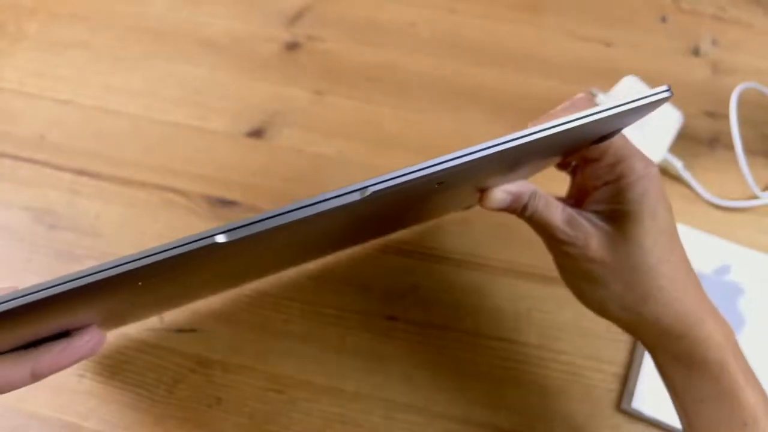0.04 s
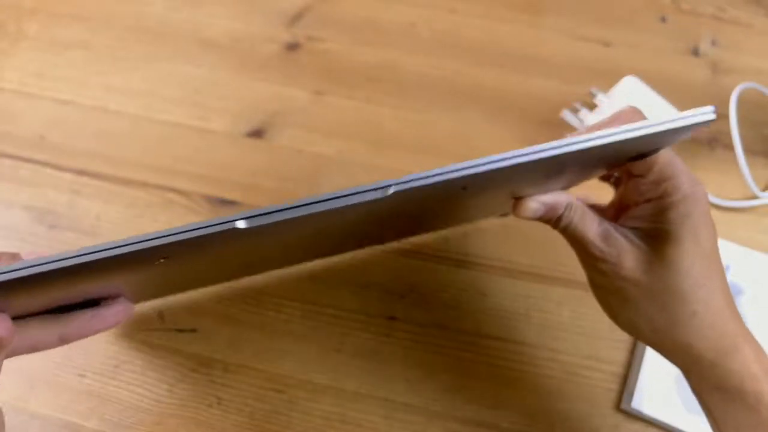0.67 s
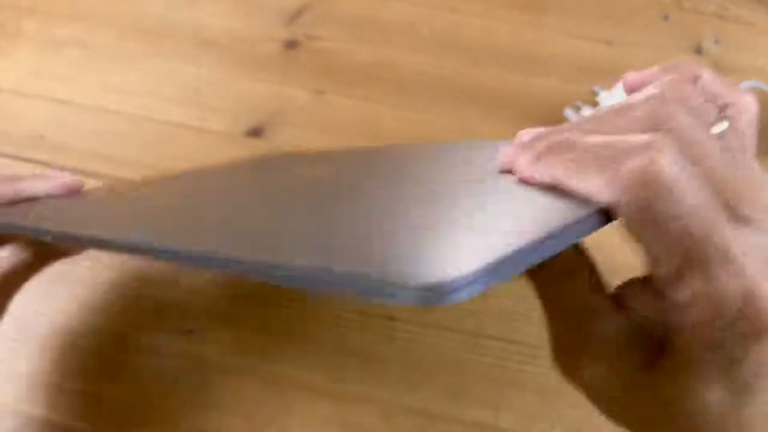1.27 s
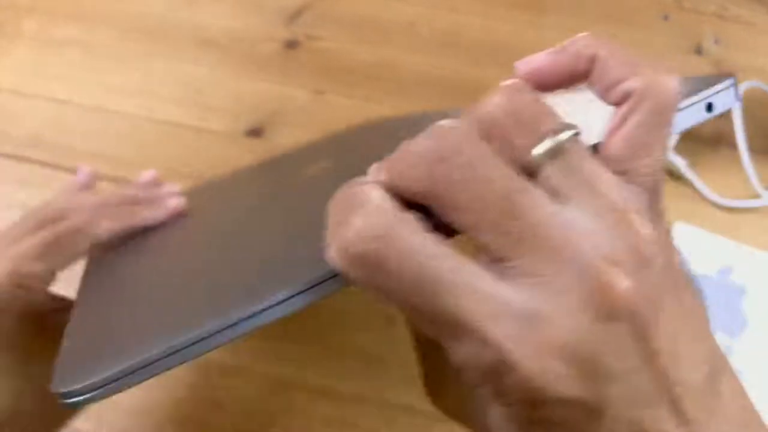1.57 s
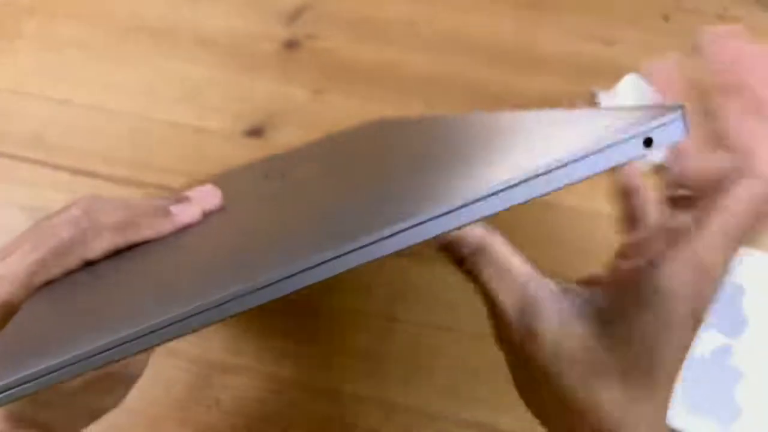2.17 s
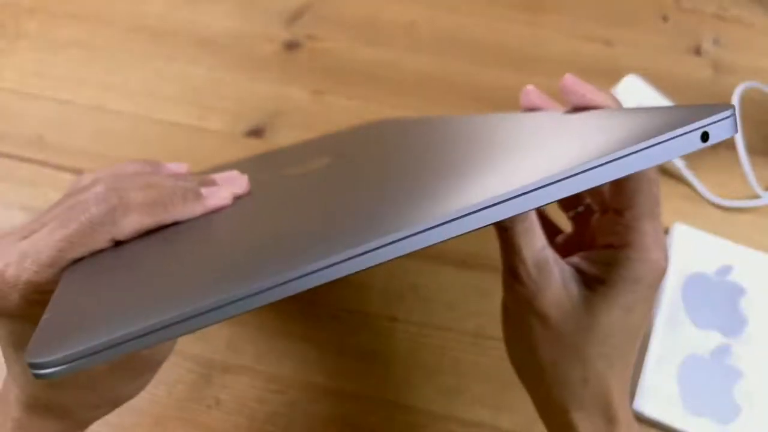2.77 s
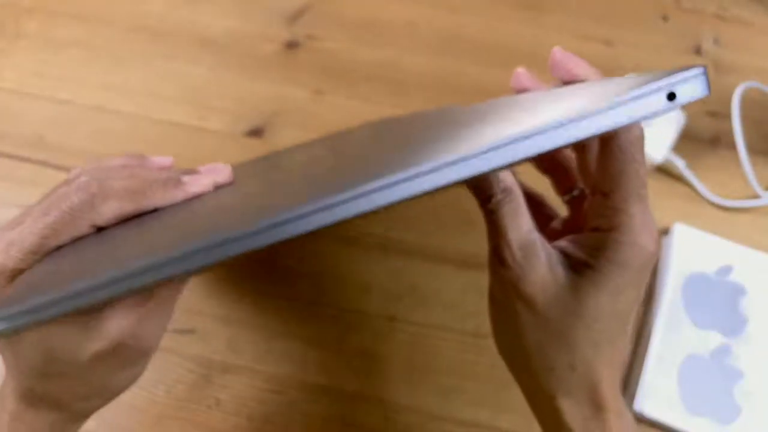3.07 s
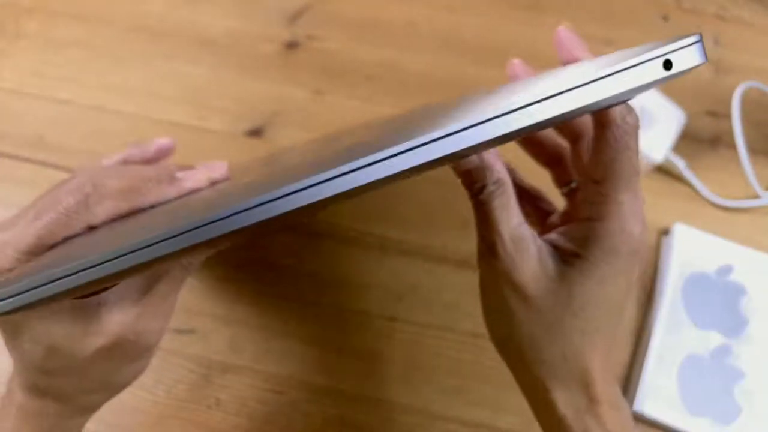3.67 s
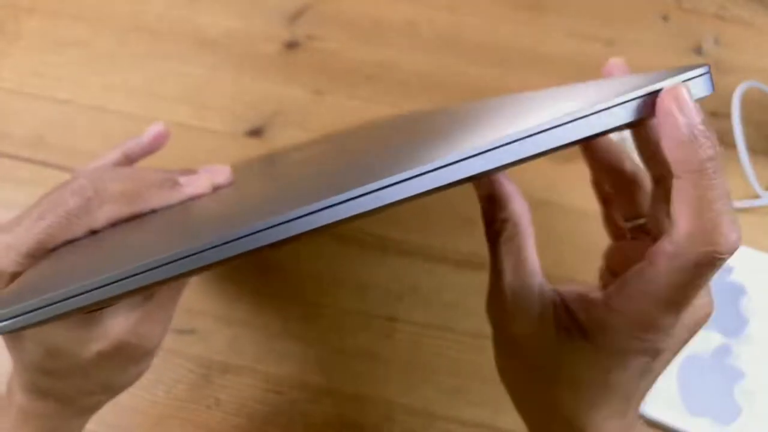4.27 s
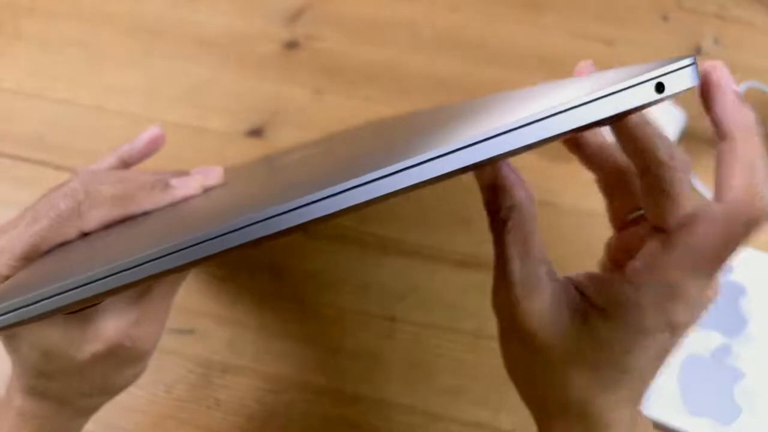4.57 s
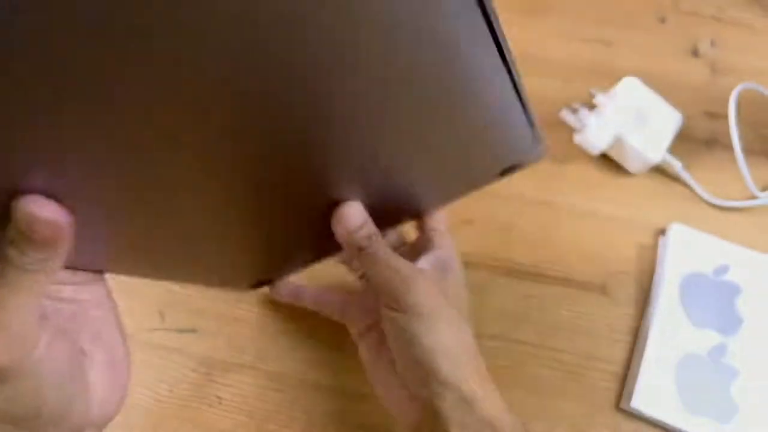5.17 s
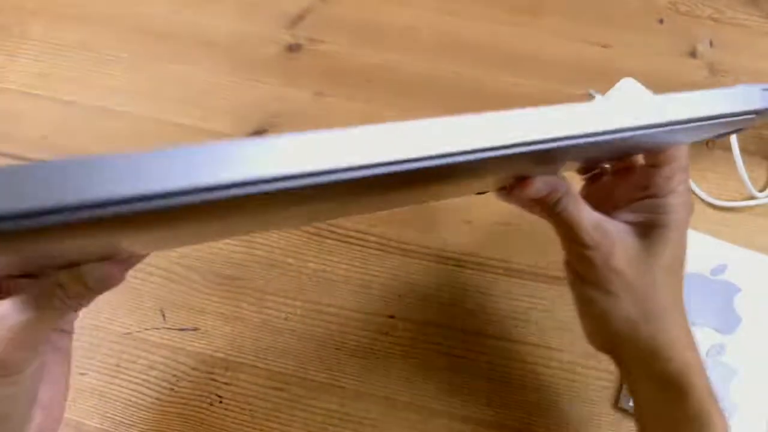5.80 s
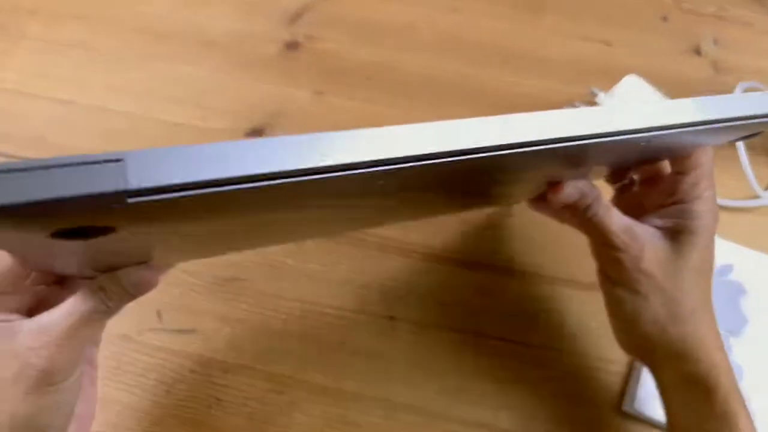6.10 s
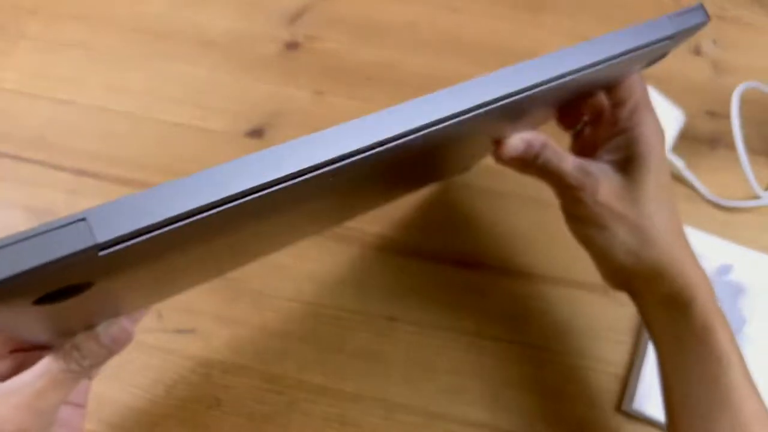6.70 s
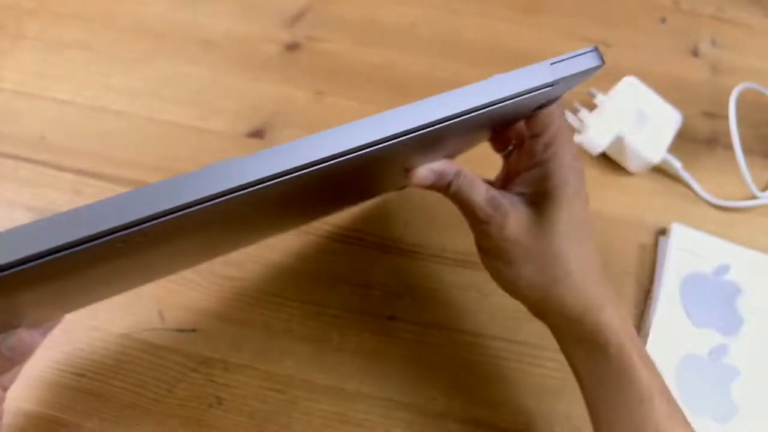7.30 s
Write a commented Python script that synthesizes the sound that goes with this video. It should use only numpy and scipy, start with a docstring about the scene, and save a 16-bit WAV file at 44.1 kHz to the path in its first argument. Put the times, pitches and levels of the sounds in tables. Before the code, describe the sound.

A low electrical hum runs through a small room while someone handles a metal laptop close by. The lid creaks faintly, then fingers swish across the matt case with a few clicks and dull, booming bumps. The handling almost stops, then resumes with more dry, hissing slides and soft taps. Near the end the case gives one firm double bump, followed by a faint rumble of palms that sinks into the hum.

```python
"""Two hands turn a closed metal laptop over above a wooden table, close to a stereo microphone.
Over the steady mains hum of a small room, finger pads rub and the lid creaks. From about 1 s skin
hisses over the matt shell, fingertips tick, bumps set case and table booming and the palms rumble.
After a lull, a second run of strokes and lighter bumps passes from 4 to 6 s. A firm double bump
lands at 6.7 s, and a last shift of grip fades into the hum."""
import sys
import numpy as np
from scipy import signal
from scipy.fft import rfft, irfft
from scipy.io import wavfile

SR = 44100
rng = np.random.default_rng(int(sys.argv[2]) if len(sys.argv) > 2 else 0)


def log_audio(samples):
    """Write samples as a 16-bit WAV file to the path given in sys.argv[1]."""
    # one column per channel
    frames = np.atleast_2d(samples).T
    # limit to full scale, then quantise
    limited = np.clip(frames, -1, 1)
    pcm = np.round(limited * 32767).astype(np.int16)
    wavfile.write(sys.argv[1], SR, pcm)


N = 328545
TIME = np.arange(N) / SR
MOTION_TIME = TIME[::32]  # coarse clock for hand movements


def gain_of(db):
    """Decibels to amplitude."""
    return 10 ** (np.asarray(db) / 20)


def unit_rms(x):
    """Scales to an rms of one."""
    return x / np.sqrt(np.mean(x ** 2) + 1e-20)


def curve_at(points, hz, column=1):
    """One column of a table, interpolated over log frequency."""
    table = np.transpose(points)
    return np.interp(np.log(hz + 1), np.log(table[0] + 1), table[column])


def band(hz, skirt_db):
    """A spectrum that peaks at hz and falls by skirt_db an octave."""
    return [(hz / 8, -3 * skirt_db), (hz, 0), (hz * 8, -3 * skirt_db)]


def add(mix, start_s, sound):
    """Mixes a stereo sound in at start_s."""
    part = mix[:, round(start_s * SR):][:, :sound.shape[1]]
    part += sound[:, :part.shape[1]]


def wander(rate_hz):
    """Smooth random drift with an rms of one."""
    steps = TIME[::64]
    hz = np.fft.rfftfreq(len(steps), steps[1])
    spectrum = rfft(rng.standard_normal(len(steps))) * np.exp(-(hz / rate_hz) ** 2)
    return unit_rms(np.interp(TIME, steps, irfft(spectrum, len(steps))))


def at_ports(pair, colour):
    """Colours two unrelated signals and blends them as the two microphone ports hear one source."""
    # stereo image: f/Hz, likeness/0-1, phase lead of the left/rad, left over right/dB
    image = [(90, 0.94, 0, -1), (321, 0.97, 0.78, 2.5), (900, 0.09, 1, 2), (3050, 0.4, -0.5, 4),
             (6530, 0.93, 1.5, 3), (8550, 0.47, 1, 0.5), (9820, 0.94, -2, 0), (12120, 1, -7, 0),
             (14300, 0.74, 4.5, 1)]
    hz = np.fft.rfftfreq(pair.shape[1], 1 / SR)
    left, unrelated = rfft(pair)
    likeness = np.clip(curve_at(image, hz), 0, 1)
    right = likeness * left + np.sqrt(1 - likeness ** 2) * unrelated
    right *= np.exp(-1j * curve_at(image, hz, column=2))
    lean = gain_of(curve_at(image, hz, column=3) / 2)
    spectra = np.array([left * lean, right / lean]) * gain_of(curve_at(colour, hz))
    return unit_rms(irfft(spectra, pair.shape[1]))


def stereo_noise(samples, colour):
    """Coloured noise as the two ports hear it."""
    return at_ports(rng.standard_normal((2, samples)), colour)


def room_tone(air_db=-53.5):
    """Mains hum beats against a slower motor tone, over soft room noise."""
    # hum and motor tones: f/Hz, rms level/dB
    tones = [(59.5, -82), (89.6, -66.5), (100.15, -47.5), (215, -85.5), (307, -78), (1046, -86)]
    # room noise: f/Hz, relative level/dB
    air_colour = [(20, -27), (27, -21.5), (32, -7), (60, 2), (95, 6.5), (112, 0.5), (135, 0.5), (200, -5.5),
                  (330, -13), (550, -19), (1100, -20), (2000, -30), (4000, -46), (11000, -46.5),
                  (12500, -51.5)]
    hum = np.zeros(N)
    for hz, db in tones:
        phase = 2 * np.pi * (hz * TIME + rng.random()) + 0.04 * wander(5.5)
        hum += gain_of(db) * np.sqrt(2) * np.sin(phase)
    return hum + gain_of(air_db) * stereo_noise(N, air_colour)


def finger_rubs():
    """Finger pads rub under the case: soft swells of friction that sound hollow in the shell."""
    # rubs: t/s, length/s, level/dB, centre f/Hz
    rubs = [(0.095, 0.81, -69.5, 604), (1.063, 0.15, -64, 1000), (2.478, 0.23, -64, 1050),
            (2.91, 0.11, -62.5, 970), (5.162, 0.058, -53, 970), (5.384, 0.13, -61.5, 960)]
    out = np.zeros((2, N))
    for start_s, length_s, db, hz in rubs:
        swell = signal.windows.tukey(round(length_s * SR), .7)
        slips = stereo_noise(SR, band(hz, skirt_db=22))
        add(out, start_s, gain_of(db) * swell * slips[:, :len(swell)])
    return out


def lid_creaks(resonance_hz=650, t60=0.017, boost_db=2):
    """The lid creaks under the fingers, each small slip tapping the same dull resonance."""
    # slips of the lid: t/s, relative level/dB
    slips = [(.157, -46), (.204, -46), (.259, -46), (.298, -56), (.358, -45), (.441, -44.5), (.478, -44.5)]
    t, out = np.arange(SR // 5) / SR, np.zeros((2, N))
    envelope = gain_of(boost_db - 60 * t / t60) * (1 - np.exp(-(t * resonance_hz) ** 2))
    for start_s, db in slips:
        tap = envelope * stereo_noise(len(t), band(resonance_hz, skirt_db=16))
        add(out, start_s, gain_of(db) * tap)
    return out


def friction(colour, catches_per_s, catch_gain, judder_db):
    """Countless tiny slips, with a few larger catches and an uneven finger speed."""
    catches = (rng.random(N) < catches_per_s / SR) * rng.standard_normal((2, N))
    slips = rng.standard_normal((2, N)) + catch_gain * unit_rms(catches)
    return unit_rms(at_ports(slips, colour) * gain_of(judder_db * wander(42)))


def stroke_envelope(moves, levels_db, speed_power):
    """Friction follows a power of hand speed as it swells and falls; overlapping moves add in energy."""
    energy = np.zeros(len(MOTION_TIME))
    for (peak_s, rise_s, fall_s), db in zip(moves, levels_db):
        ramp = np.interp(MOTION_TIME, [peak_s - rise_s, peak_s, peak_s + fall_s], [0, 1, 0])
        speed = np.sin(np.pi / 2 * ramp) ** 2
        energy += (gain_of(db) * speed ** speed_power) ** 2
    return np.interp(TIME, MOTION_TIME, np.sqrt(energy))


def skin_slides(hiss_db=3.5, fizz_db=-5, drag_db=-0.5, fizz_knee_db=-50):
    """Light contact hisses, fast strokes fizz higher still, and pressed skin drags on the shell."""
    # strokes: top speed t/s, rise/s, fall/s, relative hiss level/dB, relative drag level/dB
    strokes = [(.76, 0.042, .04, -83, -79.5), (.98, 0.22, 0.22, -67.5, -62), (1.109, .12, 0.12, -56, -56),
               (1.2, .12, 0.22, -59.5, -60), (1.31, 0.075, 0.15, -55, -64), (1.466, 0.24, 0.1, -50, -50.5),
               (1.62, 0.25, 0.15, -48, -55), (1.722, 0.056, 0.12, -53, -61), (1.83, 0.098, 0.089, -74, -67),
               (1.92, 0.071, .06, -65, -64), (2.015, 0.098, 0.21, -56.5, -61.5),
               (2.147, 0.11, 0.13, -52, -59.5), (2.27, 0.14, 0.12, -55.5, -65.5),
               (2.355, 0.076, 0.086, -56, -64), (2.44, 0.1, 0.065, -66.5, -65),
               (2.548, .07, 0.24, -82, -75), (4.15, .12, .09, -80.5, -81), (4.236, 0.067, 0.12, -64.5, -68),
               (4.522, 0.1, 0.064, -83, -79), (4.704, 0.09, 0.05, -62.5, -65.5),
               (4.869, 0.024, 0.15, -71.5, -69.5), (5.017, 0.044, 0.062, -61, -65),
               (5.216, 0.19, .12, -49, -54.5), (5.326, 0.075, 0.12, -55, -57), (5.445, .1, 0.1, -50, -54.5),
               (5.555, 0.11, 0.1, -50.5, -58), (5.718, 0.084, 0.11, -60, -62.5),
               (5.955, .19, 0.088, -54.5, -58.5), (6.035, 0.087, 0.14, -70.5, -66),
               (6.404, .14, 0.14, -79, -78), (6.63, .18, 0.24, -75, -74)]
    # bright hiss of light contact: f/Hz, relative level/dB
    hiss_colour = [(1500, -25), (4000, -23), (5500, -15), (7200, -13.5), (8300, -6), (9500, -8.5),
                   (10700, 0.5), (11400, -4), (12200, -17.5), (13200, -34.5), (14200, -43)]
    # top-end fizz of fast skin: f/Hz, relative level/dB
    fizz_colour = [(8000, -45), (10500, -19), (11800, 4), (12500, 7), (13200, -12), (14200, -27)]
    # broad, duller drag of pressed skin: f/Hz, relative level/dB
    drag_colour = [(200, -33), (600, 6), (1030, 6.5), (1400, 2.5), (2500, 1.5), (4000, -1), (5500, -4),
                   (8000, -6.5), (12000, -32)]
    hiss = gain_of(hiss_db) * friction(hiss_colour, catches_per_s=2500, catch_gain=0.37, judder_db=1.4)
    fizz = gain_of(fizz_db) * friction(fizz_colour, catches_per_s=720, catch_gain=0.28, judder_db=2.5)
    drag = gain_of(drag_db) * friction(drag_colour, catches_per_s=600, catch_gain=0.28, judder_db=1.0)
    strokes = np.array(strokes)
    light = stroke_envelope(strokes[:, :3], strokes[:, 3], speed_power=1.53)
    pressed = stroke_envelope(strokes[:, :3], strokes[:, 4], speed_power=0.87)
    brightness = light / gain_of(fizz_knee_db)
    return light * (hiss + brightness * fizz) + pressed * drag


def near_reflections(x, reflection_db=-15, paths=6):
    """Lid, table and hands mirror the hiss over short, changing paths, which ripples its colour."""
    out = x.copy()
    for path_s in rng.uniform(.0005, .003, paths):
        delay_s = path_s * np.exp(.2 * wander(1.6))
        out += gain_of(reflection_db) * np.array([np.interp(TIME - delay_s, TIME, side) for side in x])
    return out / np.sqrt(1 + paths * gain_of(reflection_db) ** 2)


def shell_ticks(t60=0.025, boost_db=2):
    """Brief snaps that rise within a cycle and die at once in the damped shell."""
    # fingertips, nails and hard edges of the bumps: t/s, relative level/dB, centre f/Hz
    ticks = [(1.101, -41.5, 3700), (1.329, -38.5, 1930), (1.363, -38.5, 4600), (2.938, -47, 590),
             (4.791, -65, 9500), (5.081, -50.5, 5040), (5.101, -53, 8800), (6.688, -48.5, 3200),
             (6.694, -36, 950), (6.705, -47.5, 3000)]
    # spectrum of a tick: f/centre f, relative level/dB
    tick_shape = [(.125, -6), (.5, -2.5), (1, 3.5), (1.3, -8.5), (3, -19), (6, -44), (12, -60)]
    t, out = np.arange(SR // 5) / SR, np.zeros((2, N))
    for start_s, db, hz in ticks:
        colour = [(hz * multiple, shape_db) for multiple, shape_db in tick_shape]
        envelope = gain_of(boost_db + db - 60 * t / t60) * (1 - np.exp(-(t * hz) ** 2))
        add(out, start_s, envelope * stereo_noise(len(t), colour))
    return out


def body_ring(rise_cycles=0.94):
    """Case and table ring after a blow, each mode swelling over its first cycle."""
    # modes of case and table: f/Hz, relative level/dB, t60/s
    modes = [(60.4, -4, 0.32), (73.3, -2, 0.19), (127.94, 0.5, 0.46), (158, 5, 0.14), (176.8, -6, 0.25),
             (215.4, -5, 0.23), (251.3, 0.5, 0.067), (303.5, -5.5, 0.11), (365.4, -13, 0.14),
             (384.6, -11.5, 0.16), (487.4, -13, 0.4), (624, -16, 0.2), (822, -8.5, 0.14), (1040, -1, 0.15),
             (1870, 4, 0.16), (3165, 14, .15), (3400, 8.5, 0.089)]
    t, ring = np.arange(SR) / SR, np.zeros(SR)
    for hz, db, t60 in modes:
        attack = 1 - np.exp(-t * hz / rise_cycles)
        ring += attack * gain_of(db - 60 * t / t60) * np.sin(2 * np.pi * hz * t)
    return ring


def driven_band(x, low_hz, high_hz, order):
    """The band that a blow can drive: harder contact reaches higher."""
    x = signal.sosfilt(signal.butter(2, low_hz, "high", fs=SR, output="sos"), x)
    return signal.sosfilt(signal.butter(order, high_hz, fs=SR, output="sos"), x)


def case_bumps(contact_s=0.0017, push_db=8.5, thud_db=3, thud_t60=0.3, thud_rise_s=0.0013, lean_db=1.0):
    """Each bump gives a soft push of air, a thud and ringing modes; its hardness sets which sound."""
    # bumps: t/s, force/dB, lowest driven f/Hz, highest driven f/Hz
    bumps = [(1.3274, -14, 298, 398), (1.3397, -19.5, 84, 253), (1.3597, -32.5, 59, 730),
             (1.4209, -23.5, 168, 430), (1.4287, -20, 55, 161), (1.4563, -29, 137, 363),
             (1.4958, -35.5, 190, 390), (1.5707, -35, 79.6, 380), (1.5925, -29, 52, 102),
             (4.87, -44, 330, 420), (4.914, -41.5, 231, 336), (5.0825, -29, 288, 353),
             (6.691, -11.5, 164, 261.6), (6.698, -14, 52.4, 162)]
    # thud of dense, short ringing: f/Hz, relative level/dB
    thud_colour = [(30, -23.5), (130, 0), (300, -5), (500, -12), (800, -13), (1500, -11.5), (3300, -7.5),
                   (3900, -14), (12000, -10.5)]
    t, out = np.arange(SR) / SR, np.zeros((2, N))
    push = gain_of(push_db) * np.sin(np.pi * np.minimum(t / contact_s, 1)) ** 2
    body = (push + body_ring()) * gain_of([[lean_db], [-lean_db]])
    thud_envelope = gain_of(thud_db - 60 * t / thud_t60) * (1 - np.exp(-t / thud_rise_s))
    for start_s, force_db, low_hz, high_hz in bumps:
        boom = driven_band(body, low_hz, high_hz, order=3)
        thud = driven_band(thud_envelope * stereo_noise(SR, thud_colour), low_hz, high_hz, order=2)
        add(out, start_s, gain_of(force_db) * (boom + thud))
    return out


def palm_rumble(lean_db=1.1):
    """Palms dragging on the case set its low modes rumbling."""
    # shifts of grip: top speed t/s, rise/s, fall/s, level/dB
    shifts = [(1.6, 0.18, 0.26, -40.5), (2.09, 0.18, 0.23, -44), (4.92, 0.14, 0.073, -49),
              (5.15, 0.074, 0.27, -52), (7.04, 0.36, 0.63, -52)]
    # dark friction of a palm: f/Hz, relative level/dB
    palm_colour = [(25, -6.5), (55, -1.5), (100, 13), (130, -12), (200, -4.5), (400, -7), (900, -34),
                   (2500, -58), (8000, -90.5)]
    drag = friction(palm_colour, catches_per_s=230, catch_gain=0.31, judder_db=3.0)[0]
    rumble = unit_rms(signal.fftconvolve(drag, body_ring())[:N])
    shifts = np.array(shifts)
    envelope = stroke_envelope(shifts[:, :3], shifts[:, 3], speed_power=1)
    return rumble * envelope * gain_of([[lean_db], [-lean_db]])


def room_tail(x, predelay_s=.006):
    """The small room's short, diffuse tail, lingering longest in the low mids."""
    # room decay: f/Hz, t60/s
    decay_times = [(100, 0.14), (500, 0.26), (3000, 0.11), (10000, 0.15)]
    hz, t, noise = signal.stft(rng.standard_normal((2, SR // 2)), SR, nperseg=256)
    decay = gain_of(-60 * t / curve_at(decay_times, hz)[:, None]) * (t > predelay_s)
    tail = signal.istft(noise * decay, SR, nperseg=256)[1]
    return signal.fftconvolve(x, tail / np.linalg.norm(tail[0]), axes=1)[:, :N]


def scene():
    """Hands, bumps and hum; the room adds its tail to the taps and to the bumps above their boom."""
    bumps = case_bumps()
    taps = shell_ticks() + lid_creaks()
    hands = near_reflections(skin_slides()) + finger_rubs() + palm_rumble()
    clatter = signal.sosfilt(signal.butter(2, 350, "high", fs=SR, output="sos"), bumps)
    reverb = gain_of(-11.5) * room_tail(clatter) + gain_of(-5) * room_tail(taps)
    return hands + bumps + taps + reverb + room_tone()


def record(dry):
    """A steep low-pass trims the treble above 14.2 kHz."""
    lowpass = signal.firwin(511, 14200, window=("kaiser", 9), fs=SR)
    return signal.oaconvolve(dry, lowpass[None], "same")


dry = scene()
out = record(dry)
log_audio(out)
```